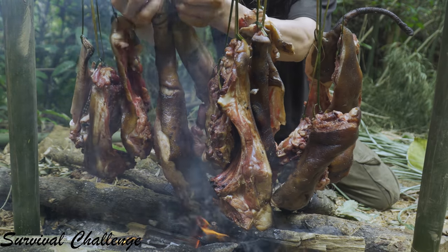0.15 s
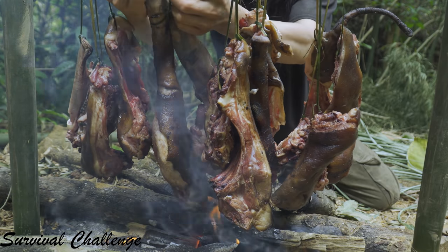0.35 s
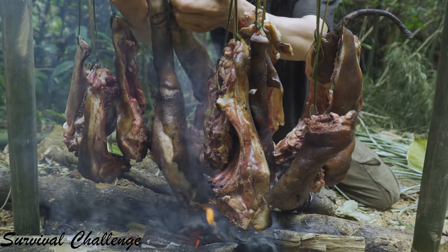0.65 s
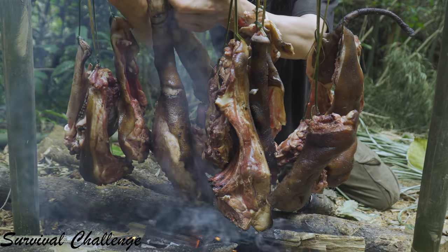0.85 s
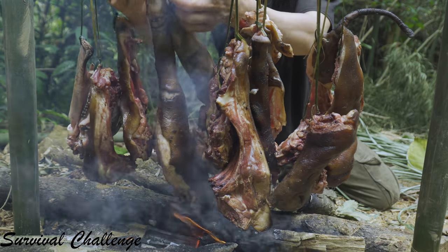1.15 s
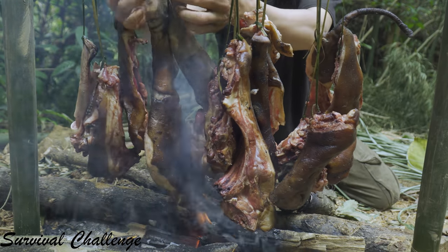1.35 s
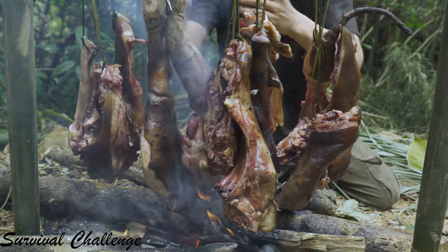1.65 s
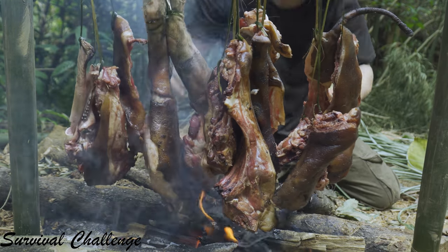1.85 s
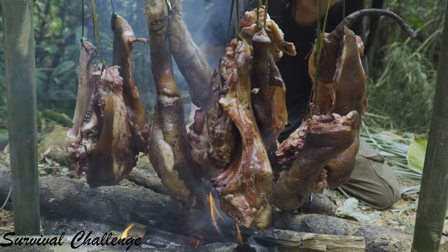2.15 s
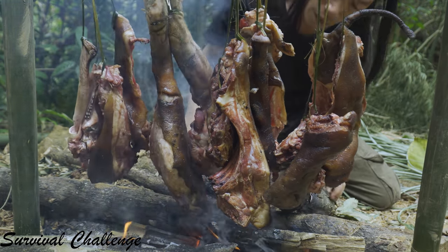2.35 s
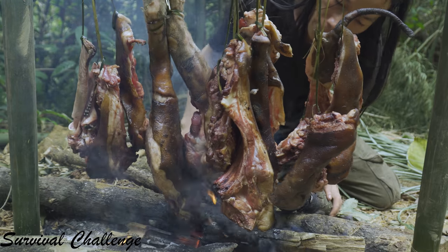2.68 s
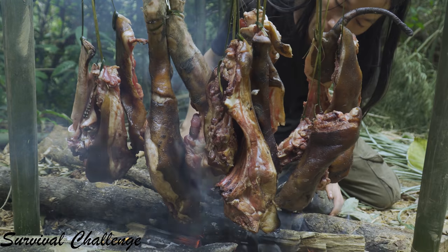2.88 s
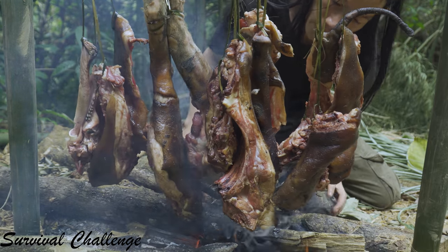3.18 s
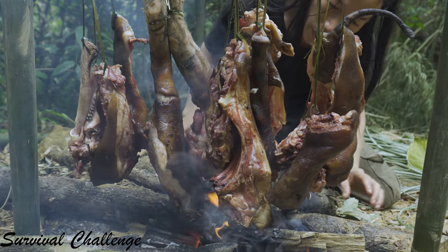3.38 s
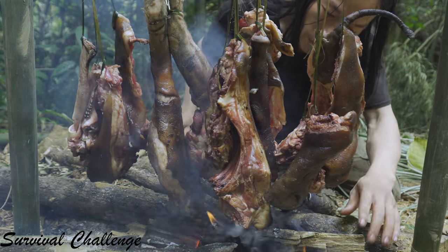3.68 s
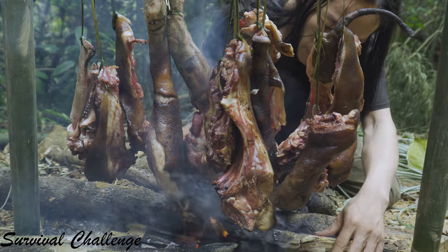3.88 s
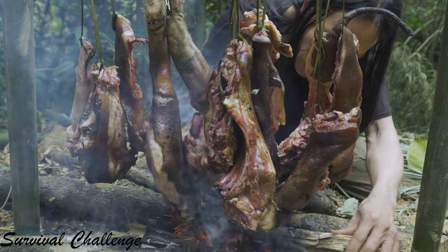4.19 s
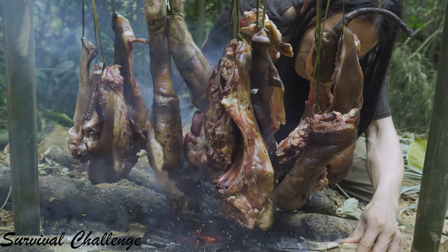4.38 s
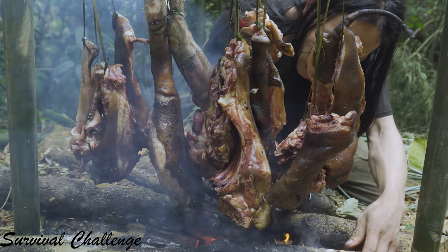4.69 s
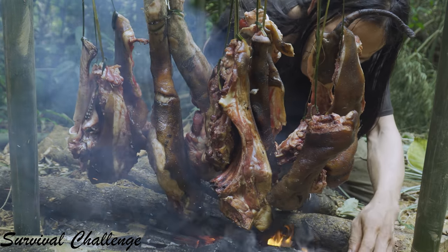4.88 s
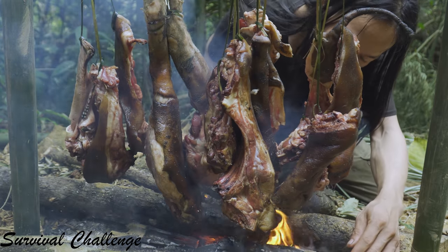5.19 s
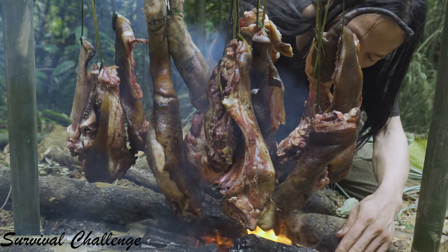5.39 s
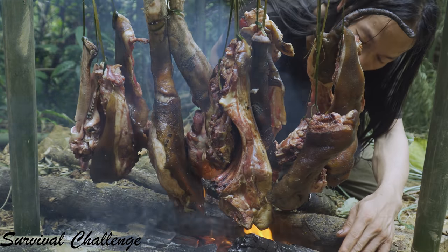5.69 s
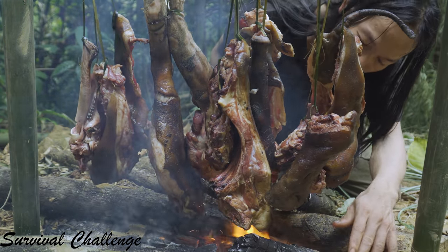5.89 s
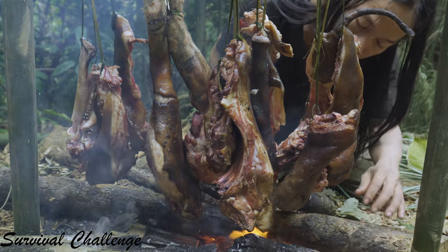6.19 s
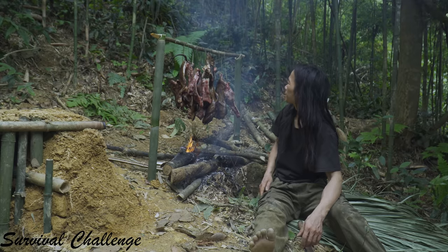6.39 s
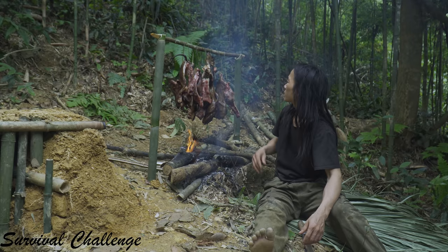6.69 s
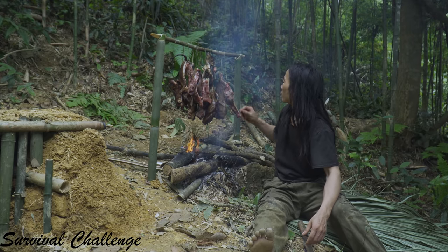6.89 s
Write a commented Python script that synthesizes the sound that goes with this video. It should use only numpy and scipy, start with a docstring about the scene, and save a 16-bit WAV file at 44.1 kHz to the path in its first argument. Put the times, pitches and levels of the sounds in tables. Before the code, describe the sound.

A close microphone hears a small wood fire under hanging meat: bright ember ticks, faint sizzling, low fluttering flames and hollow taps on a wooden rack. Midway, firewood is shoved, cracking sharply, grating and faintly squeaking, followed by brief scrapes and low thuds. A pulsing high cicada buzz and thin whines surround it throughout, with soft forest air. Sound is strongly left, with only faint insects and hiss on the right.

```python
"""A throbbing cicada drone runs throughout, with thin insect whines, soft jungle air and a small wood fire.
The fire burns close by, under hanging meat: filtered noise flutters and sizzles, and sharp clicks set
embers, splinters and the wooden rack ringing. A log is pushed in: it scrapes, snaps and squeaks.
Nearly all of the sound is in the left channel; the right has a faint share, its own insects and hiss."""
import sys
import numpy as np
from scipy import signal
from scipy.fft import rfft, irfft, next_fast_len
from scipy.io import wavfile

SR = 44100
rng = np.random.default_rng(int(sys.argv[2]) if len(sys.argv) > 2 else 0)


def log_audio(samples):
    """Write samples as a 16-bit WAV file to the path given in sys.argv[1]."""
    # one column per channel
    frames = np.atleast_2d(samples).T
    # limit to full scale, then quantise
    limited = np.clip(frames, -1, 1)
    pcm = np.round(limited * 32767).astype(np.int16)
    wavfile.write(sys.argv[1], SR, pcm)


N = 310905
T = np.arange(N) / SR

# Levels in the tables come before the trims of each layer (..._db) and the channel gains in scene().


def amp(db):
    """Decibels to gain."""
    return 10 ** (np.asarray(db) / 20)


def unit(x):
    """Scale to rms 1."""
    return x / np.sqrt(np.mean(x ** 2))


def peak(x, db):
    """Scale to a peak level."""
    return x * amp(db) / np.abs(x).max()


def loudness(x, db):
    """Scale a short sound so that its energy spread over 10 ms has this level."""
    return x * amp(db) / np.sqrt(np.sum(x ** 2) / (SR / 100))


def add(out, s, x):
    """Mix a short sound in at time s."""
    i = max(int(s * SR), 0)
    out[i:i + len(x)] += x[:max(N - i, 0)]


def curve(rows, axis=1):
    """One column of a table, joined by straight lines in time."""
    rows = np.array(rows)
    return np.interp(T, rows[:, 0], rows[:, axis])


def strokes(rows):
    """Gaussian swells from rows of (time at the strongest [s], time to fall to 1/e [s], level [dB])."""
    return sum(amp(db) * np.exp(-((T - s) / half) ** 2) for s, half, db in rows)


def noise(size=N):
    """White noise."""
    return rng.standard_normal(size)


def walk(rate):
    """Random drift with a spread near 1, turning at this many knots per second."""
    knots = noise(4096)
    return 1.2 * np.interp(T * rate, np.arange(len(knots)), knots)


def grains(rate, spread_db):
    """Random tiny clicks, about this many per second, a few much larger than the rest; rms 1."""
    size = amp(spread_db * np.minimum(rng.exponential(size=N), 5))
    struck = rng.random(N) < rate / SR
    return unit(struck * size * noise())


def burst(ring_s, tail):
    """A one-sample break, then a noisy spray of fibre clicks that falls by 60 dB in ring_s."""
    t = T[:4096]
    x = tail * noise(len(t)) * np.exp(-np.log(1000) * t / max(ring_s, .001))
    x[0] += 1
    return x


def tone(start, length, hz, db):
    """A thin tone that swells and fades in one arch; hz is its pitch at every moment."""
    along = np.clip((T - start) / length, 0, 1)
    arch = np.sqrt(2 * np.abs(np.sin(np.pi * along)))
    return amp(db) * arch * np.sin(2 * np.pi * np.cumsum(hz) / SR)


def colour(x, points):
    """Shape the spectrum of a long sound by rows of (frequency [Hz], level [dB]); rms 1."""
    size = next_fast_len(N)
    hz, db = np.transpose(sorted(points))
    f = np.maximum(np.fft.rfftfreq(size, 1 / SR), 1)
    gain = amp(np.interp(np.log(f), np.log(hz), db))
    return unit(irfft(rfft(x, size) * gain, size)[:N])


def ring(x, modes):
    """Parallel resonances from rows of (frequency [Hz], width [Hz], level [dB])."""
    top = .45 * SR
    out = 0
    for hz, width, db in modes:
        centre = min(hz, top)
        b, a = signal.iirpeak(centre, centre / min(width, top), SR)
        out = out + amp(db) * signal.lfilter(b, a, x)
    return out


# Level of the whole cicada drone: (time [s], level [dB])
DRONE_LEVEL = [(0.0, -51), (4.73, -51), (4.89, -53.5), (5.71, -55.5), (7.05, -52.5)]
# Spectrum of the cicada chorus: (frequency [Hz], level [dB])
CHORUS_COLOUR = [(3500, -32), (3850, -24.5), (4100, -13.5), (4350, -11), (4450, -14), (4530, -4),
                 (4660, -7.5), (4760, -8), (4890, -19), (5000, -14.5), (5130, -29), (5300, -58)]
# Resonances of the nearest cicada's body: (frequency [Hz], width [Hz], level [dB])
CICADA_BODY = [(4112, 35, -12), (4215, 40, -9), (4290, 40, -7), (4354, 35, -4), (4424, 35, -1),
               (4522, 45, 3), (4600, 50, -4), (4745, 50, -3), (4800, 30, -5), (5000, 70, -12)]
# Tymbal clicks within one throb: (place in the cycle [0-1], mean level [dB])
TYMBAL_CLICKS = [(.02, -2), (.1, -4), (.185, -2.5), (.395, -1.5), (.515, -7), (.775, -2.5), (.83, -8),
                 (.915, -8), (.96, 0.5)]
THROB_HZ = 25.2


def cicadas(near_db=-2, chorus_db=-1.0, throb=0.022, throb_place=0.0084, jitter_s=.00018, direct=0.1):
    """A throbbing chorus, and one near insect whose tymbal clicks ring its body in a pattern each throb."""
    swell = 1 + throb * np.cos(2 * np.pi * (T * THROB_HZ - throb_place))
    chorus = unit(colour(noise(), CHORUS_COLOUR) * swell)
    tymbal, cycles = np.zeros(N), np.arange(int(T[-1] * THROB_HZ))
    for place, db in TYMBAL_CLICKS:
        s = (cycles + place) / THROB_HZ + jitter_s * noise(len(cycles))
        i = np.clip((s * SR).astype(int), 0, N - 1)
        tymbal[i] += amp(db + noise(len(cycles)))
    # part of each click radiates at once, the rest rings on in the body
    body = ring(tymbal, CICADA_BODY) + direct * ring(tymbal, [(4750, 470, 0)])
    near = colour(body, [(3500, -47), (4100, -1.5), (4500, 8), (4950, 0.0), (5250, -15)])
    return (amp(chorus_db) * chorus + amp(near_db) * near) * amp(curve(DRONE_LEVEL))


# Nearer whines that stand out: (start [s], length [s], mean pitch [Hz], level [dB])
NEARER_WHINES = [(0.098, 0.43, 2797, -60.5), (1.578, 0.53, 2785, -62), (2.25, 1.3, 2812, -64),
                 (5.29, 1.3, 2600, -69), (6.34, 0.34, 2742, -61.5), (6.625, 0.4, 2710, -54.5),
                 (6.994, 0.041, 2720, -51.5)]
# the far whines hold one mean level, then fade
WHINE_DB, WHINE_STOPS_S, WHINE_FADE_DB_PER_S = -62, 6.53, 31


def whiners(centre_hz=2735, spread_hz=64, waver_hz=9, count=11):
    """Far insects each hold a thin wavering tone; now and then a nearer one swells out."""
    far = 0
    for place in np.linspace(-2, 2, count):
        hz = centre_hz + spread_hz * place + 12 * walk(2) + 6 * walk(50)
        swell_db = 4 * walk(4)
        # the tones away from the centre pitch are weaker
        far = far + amp(-2.2 * place ** 2 + swell_db) * np.sin(2 * np.pi * np.cumsum(hz) / SR)
    fade_db = WHINE_FADE_DB_PER_S * np.maximum(T - WHINE_STOPS_S, 0)
    far = unit(far) * amp(WHINE_DB - fade_db)
    nearer = sum(tone(start, length, hz + waver_hz * walk(15), db)
                 for start, length, hz, db in NEARER_WHINES)
    return far + nearer


# Spectrum of the forest air: (frequency [Hz], level in each Hz [dB])
AIR_COLOUR = [(20, 1), (50, 4), (120, -9.5), (250, -20), (500, -23.5), (1000, -19), (2000, -23.5),
              (4000, -23.5), (8000, -32), (16000, -25)]


def forest(air_db=-59):
    """Soft air and far foliage: shaped noise whose level drifts slowly."""
    return colour(noise(), AIR_COLOUR) * amp(air_db + walk(2.75))


# Spectrum of the steady flames: (frequency [Hz], level [dB])
FLAME_SPECTRUM = [(20, -0.5), (50, 4), (80, 2), (140, -2), (250, -10), (400, -16.5), (700, -18.5),
                  (1500, -32), (4000, -55)]
# Flames flare with a low flutter: (time at the strongest [s], time to fall to 1/e [s], level [dB])
FLARE_SWELLS = [(3.056, 0.036, -41.5), (4.297, 0.038, -41.5), (4.746, 0.29, -49), (5.06, 0.15, -48.5),
                (6.043, 0.092, -46.5), (6.188, 0.035, -47)]
# Spectrum of the flares: (frequency [Hz], level [dB])
FLARE_SPECTRUM = [(20, -11), (70, 1.5), (150, -0.5), (260, -7), (420, -11), (800, -30.5), (3000, -34)]
# Sap sizzling in the wood: (time [s], level [dB]); the scattered embers follow it too
SIZZLE_LEVEL = [(0.0, -62), (1.96, -62.5), (2.51, -57), (2.69, -60.5), (3.79, -63), (4.38, -59),
                (7.05, -67.5)]
# Spectrum of the sizzle: (frequency [Hz], level [dB])
SIZZLE_SPECTRUM = [(300, -0.5), (800, 4.5), (1600, 0), (3300, 2.5), (5300, 1.5), (6500, 1.5), (9000, 3),
                   (12000, -1), (16000, -10)]
# Flurries of ember ticks: (time at the strongest [s], time to fall to 1/e [s], level before ringing [dB])
EMBER_FLURRIES = [(.9, 0.18, -62), (2.47, 0.19, -54.5), (2.96, 0.17, -60), (4.65, 0.43, -62),
                  (5.4, 0.36, -64)]
# Resonances of a tiny ember: (frequency [Hz], width [Hz], level [dB])
EMBER_RING = [(1700, 1250, 6.5), (6200, 1400, 4), (11500, 7500, 2)]
# each flare lifts the flame rumble around it: dB against the flare, times its length
FLAME_DB, FLARE_LIFT_DB, FLARE_LIFT_WIDTH = -55.5, -10, 2


def fire(flare_db=-1, sizzle_db=0.5, embers_db=-9, flurry_db=-1):
    """Flames flutter low and flare; sap sizzles, and tiny embers tick, now and then in flurries."""
    lift = strokes([(s, half * FLARE_LIFT_WIDTH, db + FLARE_LIFT_DB) for s, half, db in FLARE_SWELLS])
    flame = colour(noise() * amp(2 * walk(40)), FLAME_SPECTRUM) * (amp(FLAME_DB) + lift)
    flutter = colour(noise() * amp(3.8 * walk(60)), FLARE_SPECTRUM)
    flare = flutter * strokes(FLARE_SWELLS) * amp(flare_db)
    heat = amp(curve(SIZZLE_LEVEL))
    sizzle = colour(noise(), SIZZLE_SPECTRUM) * heat * amp(sizzle_db)
    scattered = grains(rate=45, spread_db=2) * heat * amp(embers_db)
    flurries = grains(rate=97, spread_db=2.0) * strokes(EMBER_FLURRIES) * amp(flurry_db)
    return flame + flare + sizzle + ring(scattered + flurries, EMBER_RING)


# Thuds of settling logs: (time [s], peak level [dB], pitch [Hz])
LOG_THUDS = [(0.064, -41, 68), (1.18, -54, 238), (4.257, -37, 298), (4.294, -37.5, 89.5),
             (5.107, -28.5, 133), (5.822, -30.5, 145), (6.14, -30, 120)]
# Knocks on the rack and logs: (time before delay_s [s], peak level [dB], brightest frequency [Hz])
WOOD_KNOCKS = [(.073, -40.5, 401), (0.4, -38.5, 1060), (0.564, -38, 1920), (0.581, -39.5, 1040),
               (0.679, -38.5, 1040), (0.791, -35, 1050), (0.834, -34, 1050), (.976, -31.5, 980),
               (1.364, -35.5, 1070), (1.828, -39.5, 980), (2.243, -40, 1650), (2.926, -37, 2060),
               (3.96, -39.5, 644), (4.246, -22, 1200), (5.889, -43.5, 770), (6.619, -41.5, 885)]
# Resonances of the knocked and rubbed wood: (frequency [Hz], width [Hz], level [dB])
RACK_MODES = [(628, 91, 0.5), (1085, 55, 1.5), (1670, 760, -6.5), (2430, 810, -1), (3630, 1700, -3)]
# Hanging meat rubs on the rack: (time at the strongest [s], time to fall to 1/e [s], level [dB])
RACK_RUBS = [(.16, 0.035, -60.5), (.58, 0.026, -58), (1.26, 0.074, -60.5)]
# Bark scrapes over embers: (time at the strongest [s], time to fall to 1/e [s], level [dB])
BARK_SCRAPES = [(2.614, 0.013, -42), (4.0, 0.056, -54.5), (4.24, 0.052, -43), (4.344, 0.0079, -45.5),
                (4.937, 0.019, -47.5), (5.353, .03, -48.5), (5.435, 0.0083, -43), (5.462, 0.012, -36.5),
                (5.486, .011, -39.5)]
KNOCK_RING_S = 0.029


def firewood(knock_db=0, contact_db=-3, rub_db=0, scrape_db=-1, thud_db=-1, delay_s=0.001354):
    """Wood knocks, the rack is rubbed, bark grates in little slips, and logs settle with a damped thud."""
    out = np.zeros(N)
    for s, db, hz in WOOD_KNOCKS:
        blow = burst(KNOCK_RING_S, tail=0.28)
        # each spot favours its own pitch
        spot = ring(blow, [(hz, 1.28 * hz, 0)])
        wood = ring(spot, RACK_MODES + [(1.022 * hz, 0.1 * hz, 4)])
        contact = ring(blow, [(3 * hz, 3 * hz, 0), (9000, 9000, -9)])
        # the contact is harder for higher knocks, up to 1000 Hz
        hardness = min(hz / 1000, 1) ** 2
        knock = peak(wood, 0) + peak(contact, contact_db) * hardness
        add(out, s + delay_s, peak(knock, db + knock_db))
    for s, db, hz in LOG_THUDS:
        t = T[:4096]
        thud = -np.sin(2 * np.pi * hz * t) * np.exp(-1.6 * hz * t)
        add(out, s, peak(thud, db + thud_db))
    rack = unit(ring(ring(grains(rate=1100, spread_db=6.5), [(1046, 250, 0)]), RACK_MODES))
    bark = colour(grains(rate=2600, spread_db=0.5), [
        (200, 6), (800, 0.5), (2200, 2.5), (4500, 5.5), (6500, 3.5), (9000, 3.5), (16000, -3.5)])
    rubs = amp(rub_db) * strokes(RACK_RUBS) * rack
    scrapes = amp(scrape_db) * strokes(BARK_SCRAPES) * bark
    return out + rubs + scrapes


# Loudest ember ticks: (time before delay_s [s], peak level [dB], brightest frequency [Hz])
EMBER_TICKS = [(0.264, -25, 8450), (0.6767, -29, 5400), (.691, -37, 8600), (0.7236, -29.5, 10800),
               (1.6635, -30, 11900), (1.9112, -33, 12600), (2.0014, -29, 9840), (2.044, -30, 13500),
               (2.467, -23, 9800), (2.582, -31, 6900), (2.6376, -27.5, 5370), (2.8997, -25, 12300),
               (4.584, -33, 6750), (5.037, -33, 6670), (5.342, -29.5, 6940), (7.031, -34, 6080)]
# Firewood snaps: (time [s], level over 10 ms [dB], brightest frequency [Hz], ring [s],
# level of the wood body against the splinter [dB])
WOOD_SNAPS = [(1.1794, -35.5, 6400, 0.0064, -3), (4.231, -35.5, 6340, 0.014, -10),
              (4.2464, -25, 6200, 0.0078, -7), (4.2553, -35, 6100, 0.036, -3.5),
              (4.3117, -36.5, 3130, 0.027, 10), (4.3323, -39.5, 3070, 0.017, 5),
              (4.4265, -42, 5560, 0.022, -4), (4.4849, -37, 5940, .028, -4), (4.5069, -34, 6100, 0.028, -4)]
# Resonances of the snapping wood: (frequency [Hz], width [Hz], level [dB])
SNAP_BODY = [(390, 130, 3), (745, 720, 5), (1060, 320, -2), (1760, 53, 15), (2410, 410, 13),
             (3570, 2600, 22.5)]
TICK_RING_S = 0.014
# a short clean break rings the low modes of the wood, a long tear the higher ones
BODY_HZ_PER_RING_S = 86500


def crackle(tick_db=1, snap_db=0, open_s=0.0014, delay_s=.0013):
    """Gas pockets burst in the embers as bright ticks; bigger snaps also ring the wood."""
    out = np.zeros(N)
    for s, db, hz in EMBER_TICKS:
        tick = ring(burst(TICK_RING_S, tail=0.11), [(hz, 9000, 0), (hz, 1500, 3)])
        add(out, s + delay_s, peak(tick, db + tick_db))
    for s, db, hz, ring_s, body_db in WOOD_SNAPS:
        crack = burst(ring_s, tail=0.66)
        # the splinter sings near one pitch above a crack that is broader the quicker the break
        opened = ring(crack, [(hz, 0.57 * hz, 0)]) + open_s / ring_s * crack
        splinter = ring(opened, [(hz, 0.077 * hz, 1), (hz, 2 * hz, 0)])
        dull_hz = min(BODY_HZ_PER_RING_S * ring_s, SR / 4)
        b, a = signal.butter(1, dull_hz, fs=SR)
        body = ring(signal.lfilter(b, a, burst(ring_s, tail=0.092)), SNAP_BODY)
        snap = unit(splinter) + amp(body_db) * unit(body)
        add(out, s, loudness(snap, db + snap_db))
    return out


# Shifted wood squeaks: (start [s], length [s], mean pitch at the start [Hz], level [dB])
WOOD_SQUEAKS = [(4.33, 0.055, 1750, -61), (4.672, .28, 1623, -66), (5.925, .11, 1730, -67)]
SQUEAK_SAG_HZ_PER_S = 600


def squeaks(rough_hz=60):
    """Wood slips on wood with a faint squeak whose pitch sinks and jitters fast."""
    out = 0
    for start, length, hz, db in WOOD_SQUEAKS:
        sinking = hz - SQUEAK_SAG_HZ_PER_S * (T - start)
        out = out + tone(start, length, sinking + rough_hz * walk(300), db)
    return out


# Thin hiss swells near 6.5 kHz: (time at the strongest [s], time to fall to 1/e [s], level [dB])
HISS_SWELLS = [(4.58, 0.041, -56), (4.72, 0.046, -54), (4.93, 0.018, -52.5), (5.35, 0.075, -60),
               (5.53, 0.01, -50), (5.85, 0.33, -67)]


def thin_hiss(swell_db=-1):
    """A thin hiss swells near 6.5 kHz: dense grains ring in a narrow band."""
    narrow = ring(grains(rate=1100, spread_db=2.5), [(6500, 890, 0)])
    hiss = ring(narrow, [(6600, 6600, 0)])
    return unit(hiss) * strokes(HISS_SWELLS) * amp(swell_db)


def scene(left_db=5, right_db=-14, diffuse_db=-22, hiss_db=-65):
    """All is strong on the left; the faint right adds its own surroundings and some hiss."""
    near = cicadas() + whiners() + forest() + fire() + firewood() + crackle() + squeaks() + thin_hiss()
    around = cicadas() + whiners() + forest(air_db=-45.5)
    left = amp(left_db) * near
    right = amp(right_db) * near + amp(diffuse_db) * around + amp(hiss_db) * noise()
    return np.array([left, right])


def record(dry):
    """The recorder behind the microphones cuts the top steeply above 16 kHz."""
    return signal.sosfilt(signal.ellip(10, .1, 70, 16000, fs=SR, output="sos"), dry)


dry = scene()
out = record(dry)
log_audio(out)
```